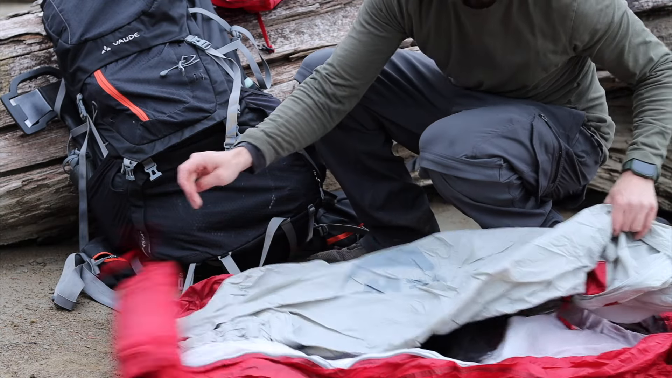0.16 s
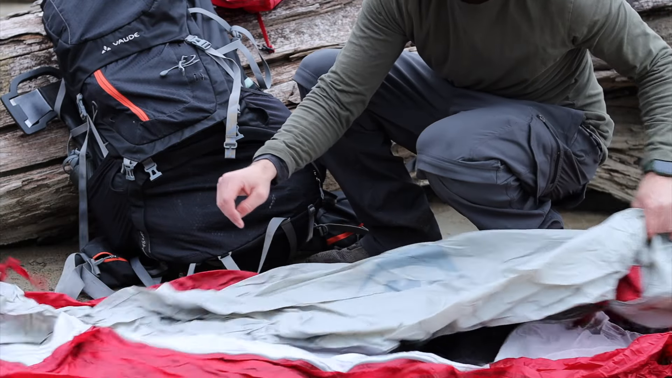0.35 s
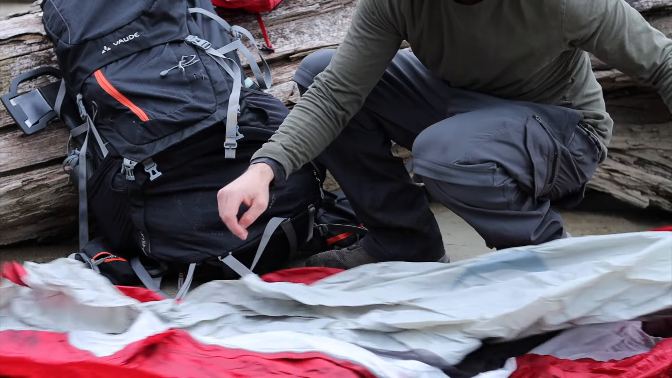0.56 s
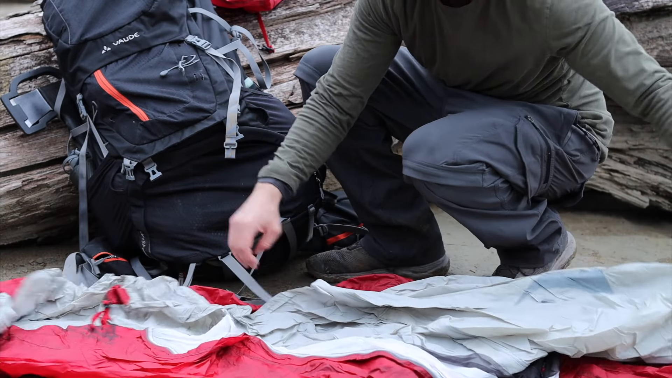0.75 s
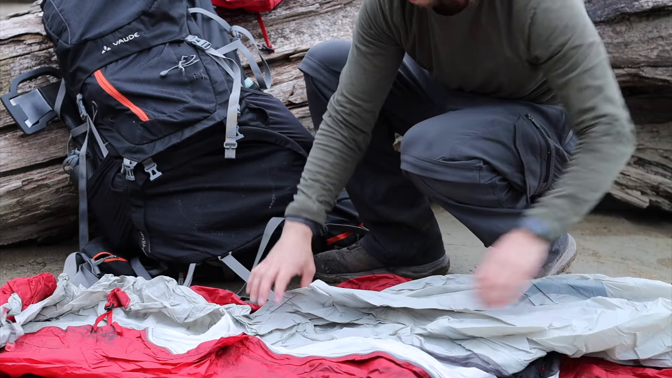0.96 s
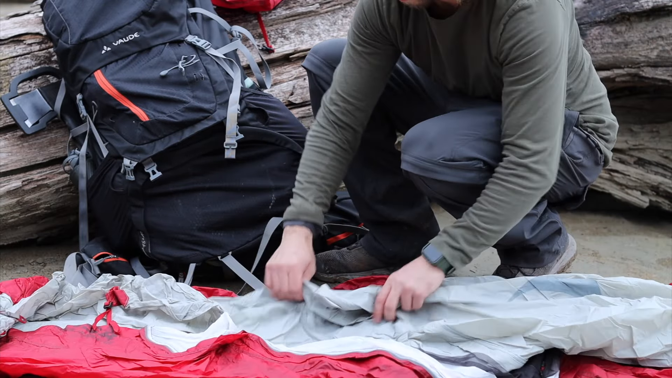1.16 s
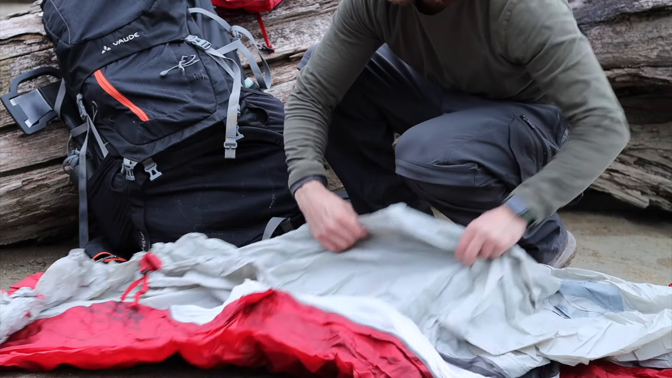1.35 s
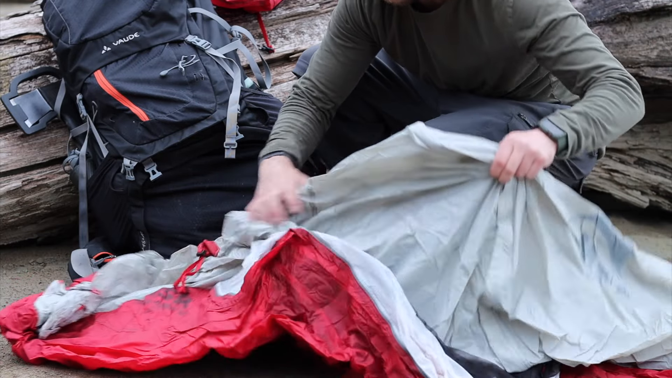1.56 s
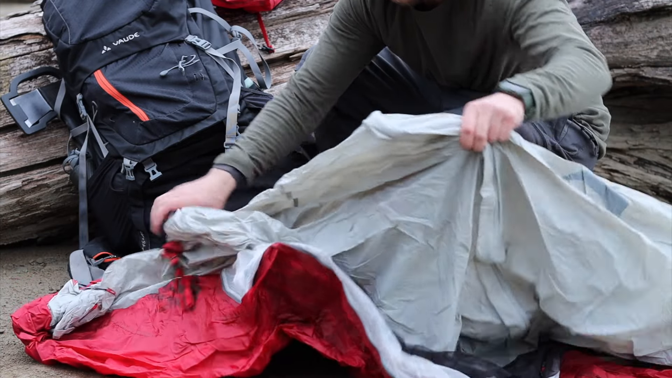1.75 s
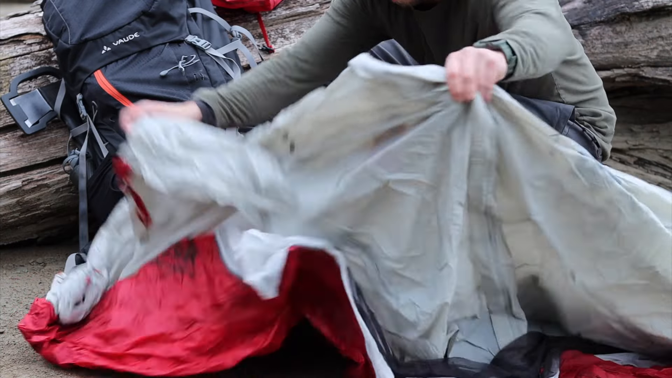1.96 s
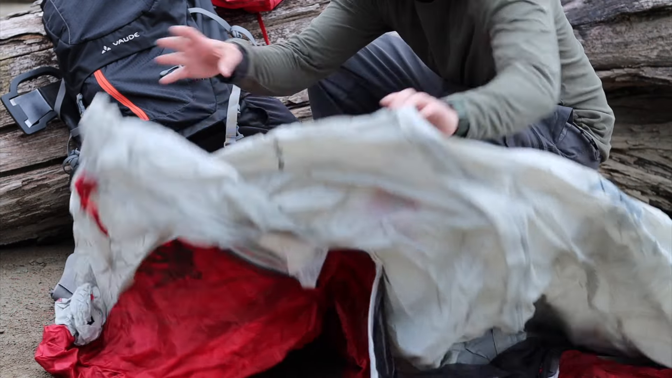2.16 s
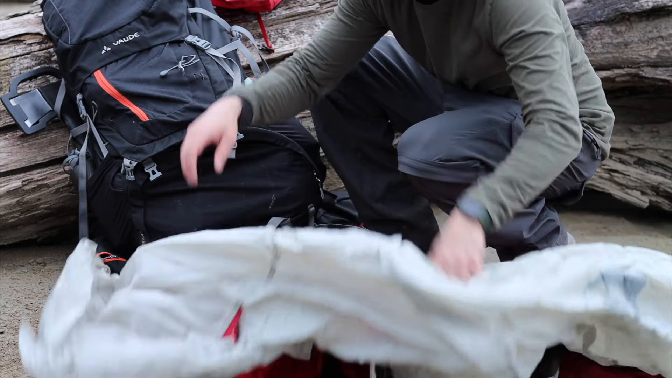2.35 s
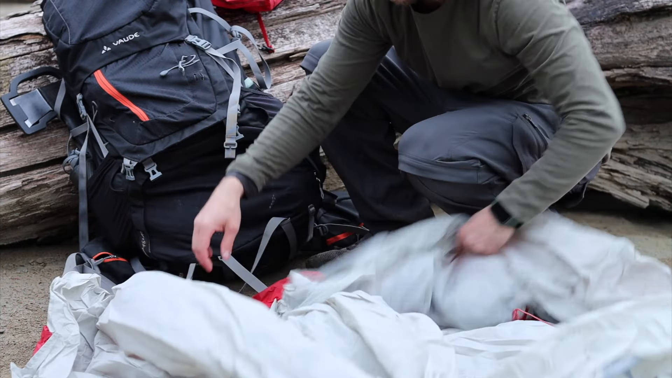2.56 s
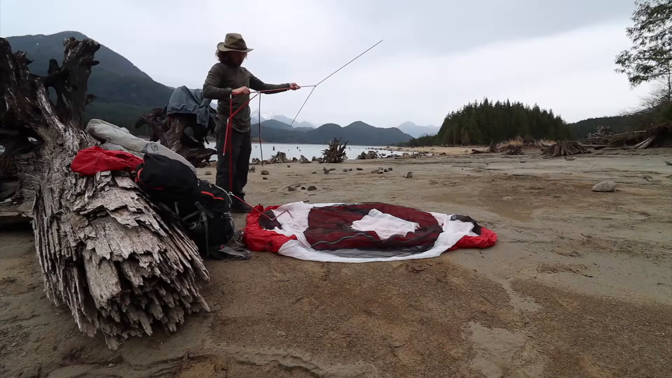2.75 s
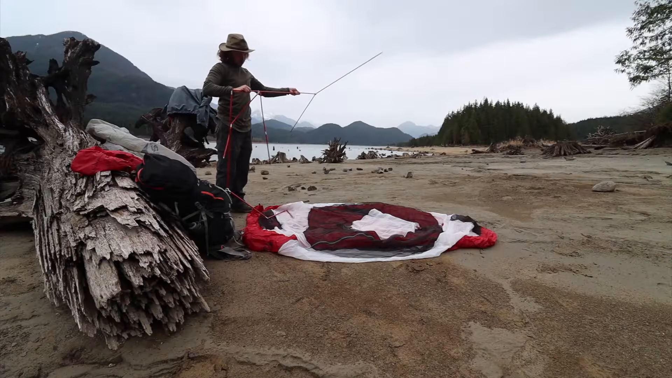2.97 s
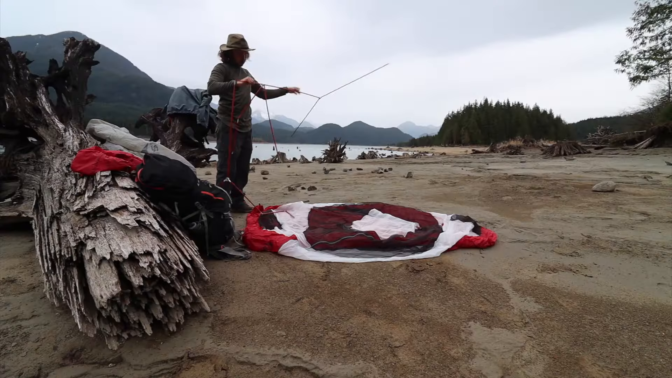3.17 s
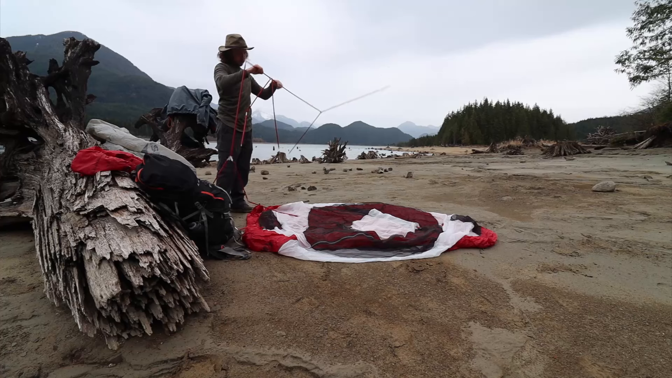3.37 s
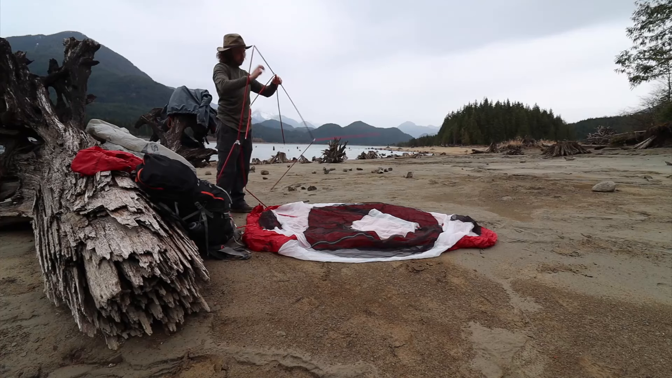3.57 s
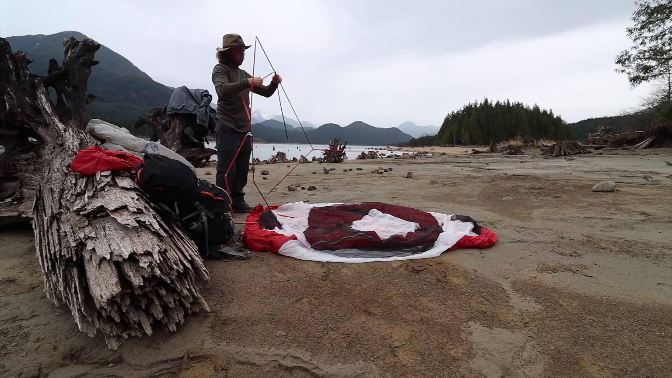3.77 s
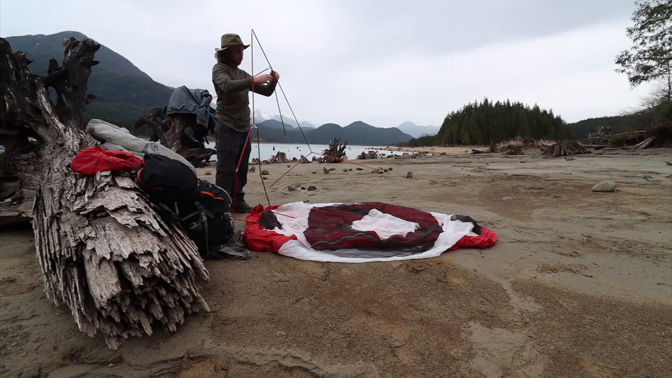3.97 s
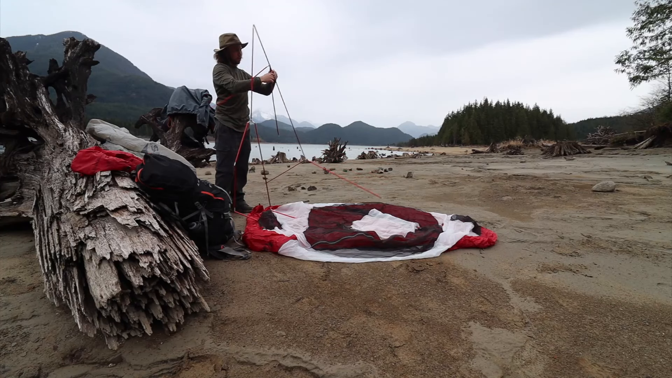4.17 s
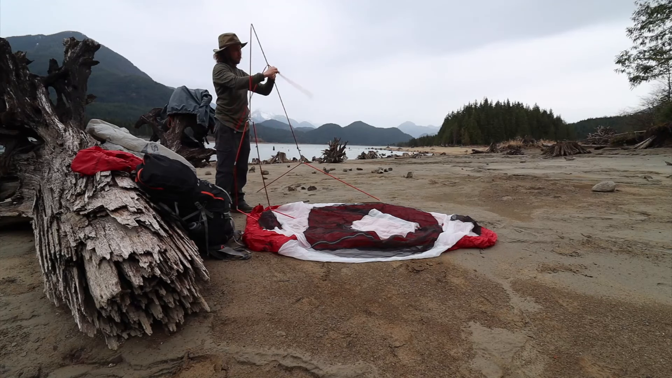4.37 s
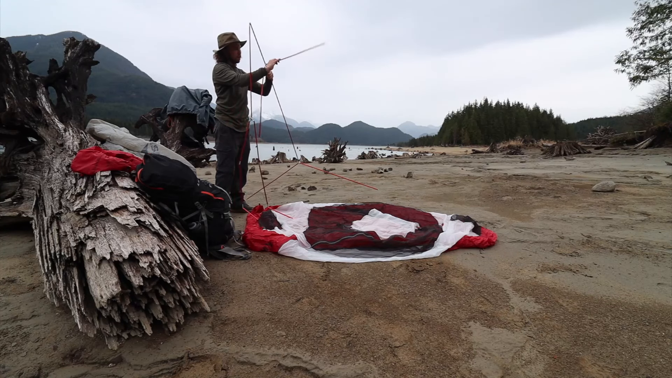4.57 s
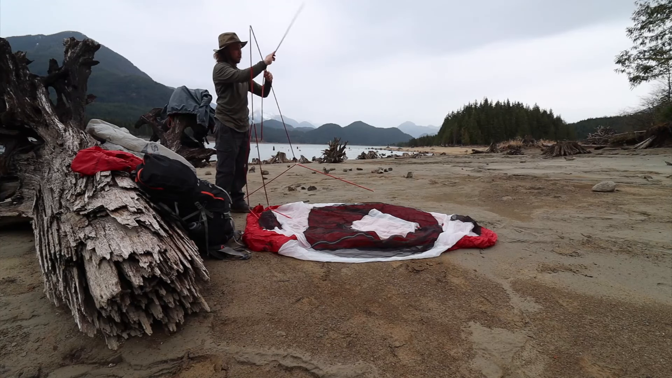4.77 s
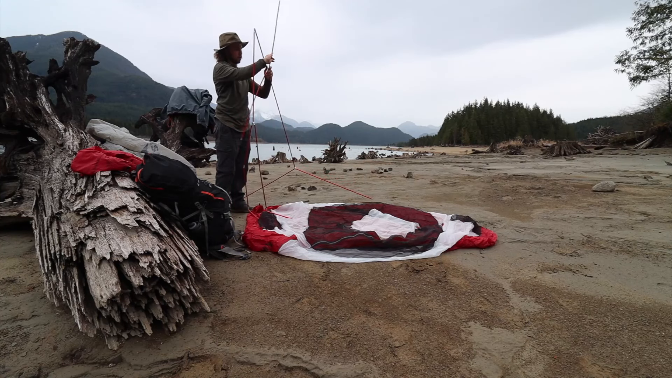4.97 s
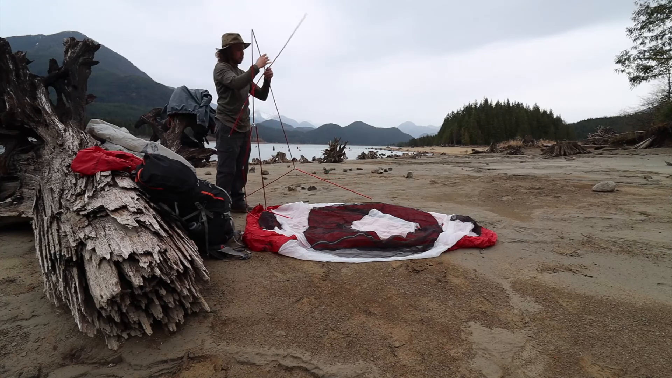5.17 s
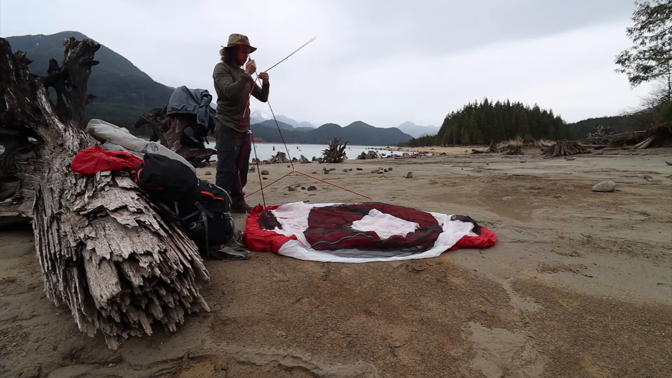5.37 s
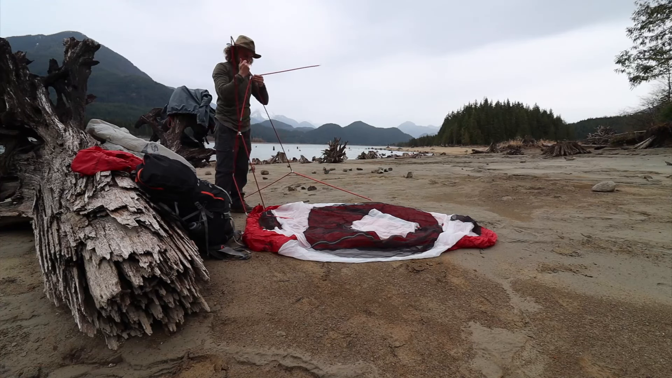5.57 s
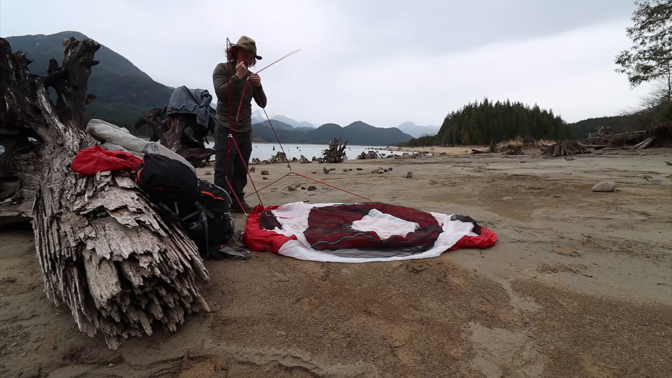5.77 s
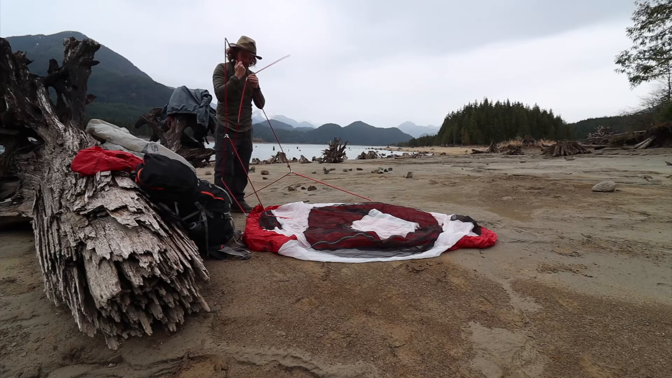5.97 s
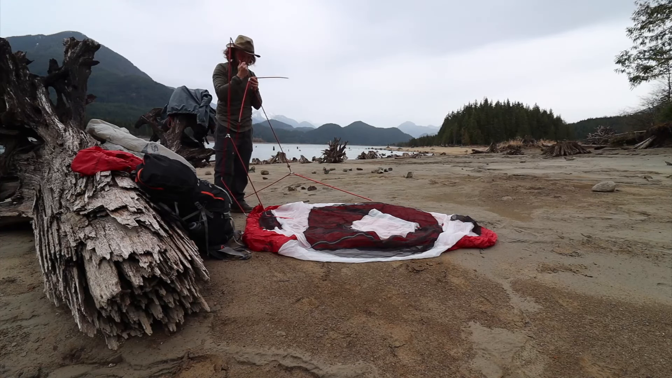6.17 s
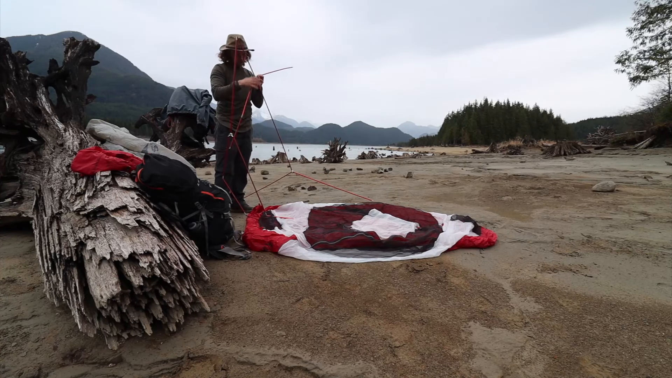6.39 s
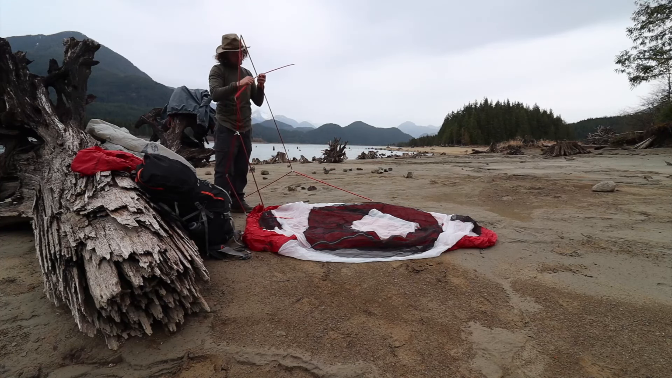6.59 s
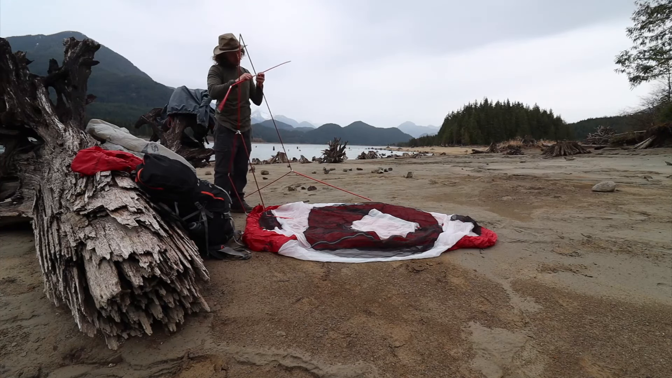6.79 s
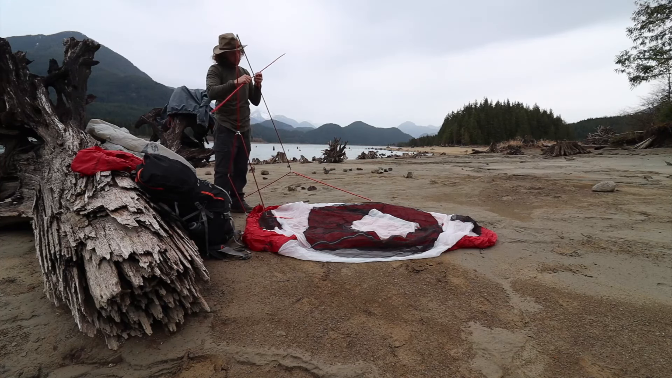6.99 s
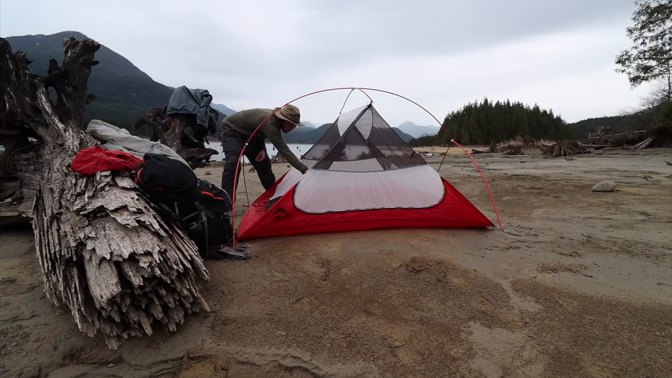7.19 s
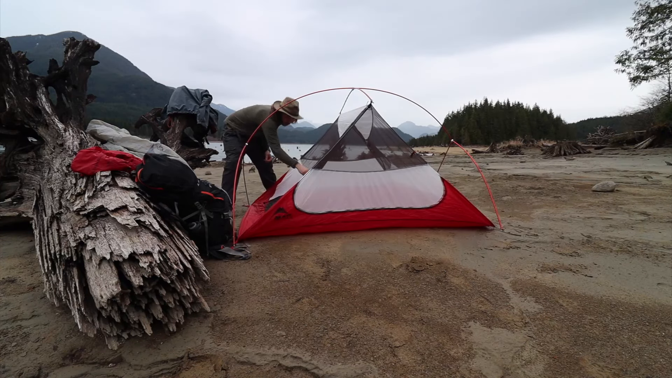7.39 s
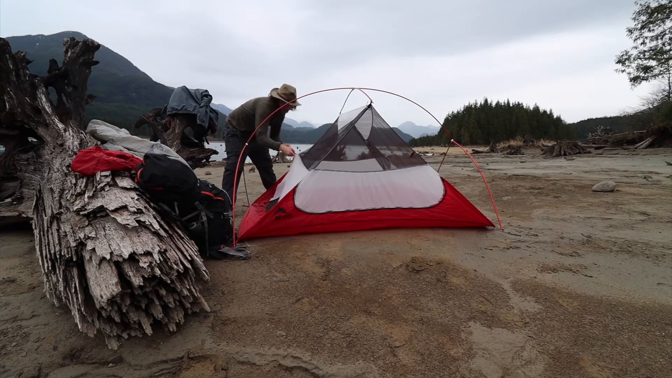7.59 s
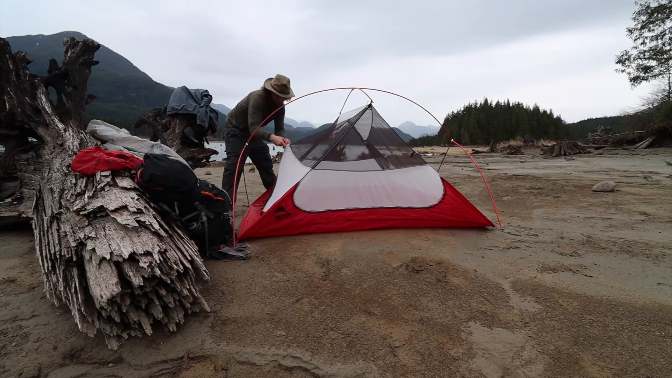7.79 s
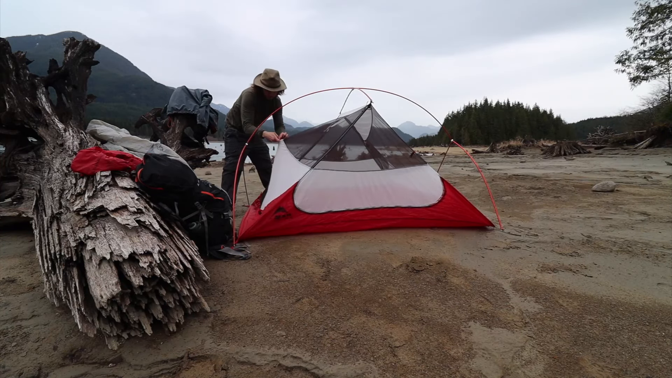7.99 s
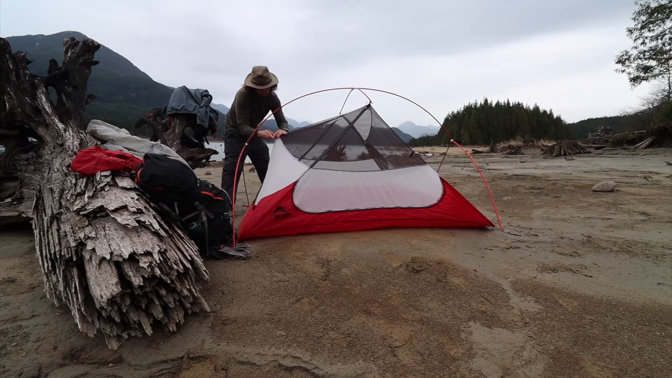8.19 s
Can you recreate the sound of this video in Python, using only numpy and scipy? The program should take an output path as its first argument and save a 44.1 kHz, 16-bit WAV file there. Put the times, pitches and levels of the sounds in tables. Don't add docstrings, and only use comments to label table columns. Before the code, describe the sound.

Nylon tent cloth rustles, snaps and crumples close by, then aluminium poles click and ring farther off on a quiet, faintly windy lake shore.

```python
import sys
import numpy as np
from scipy import signal
from scipy.fft import rfft, irfft, next_fast_len
from scipy.io import wavfile
from scipy.ndimage import uniform_filter1d

SR = 44100
rng = np.random.default_rng(int(sys.argv[2]) if len(sys.argv) > 2 else 0)


def ratio(d):
    e = np.asarray(d, float) / 20
    return 10 ** e


def wav_out(sig):
    wavfile.write(sys.argv[1], SR, np.round(np.clip(np.atleast_2d(sig).T, -1, 1) * 32767).astype(np.int16))


N = 363384
STEP = 40

# (frequency [Hz], level [dB per Hz])
SHORE_COLOUR = [(60, -11), (100, -3), (200, -5), (400, -4.5), (800, -7), (1400, -10), (2400, -16.5),
                (5000, -22), (10000, -28.5), (12700, -32), (13500, -48)]
SHORE_DB = -62.5
# (frequency [Hz], shared share [0-1])
SHORE_ALIKE = [(100, 0.9), (300, 0.81), (650, 0.48), (1400, 0), (15000, 0.18)]
# (time [s], hold [s], level [dB])
GUSTS = [(.05, .1, -92), (1.19, .1, -84), (1.88, .05, -79), (2.7, .03, -75), (3.63, 0.4, -71),
         (4.33, 0.034, -66.5), (4.6, 0.63, -70.5), (5.6, 0.33, -72.5), (6.15, 0.26, -69.5),
         (6.72, .1, -74.5), (7.5, .05, -71), (7.7, 0.47, -80.5)]
GUST_RISE_DB_PER_S, GUST_FALL_DB_PER_S, CALM_DB = 52, 60, -85.5
# (time [s], level [dB])
HUM_LOW = [(0, -75), (.15, -67.5), (.4, -66.5), (.8, -63), (1.1, -74), (1.3, -67), (1.5, -71),
           (1.75, -66.5), (2.0, -72), (2.3, -70), (2.5, -69), (2.7, -64), (2.76, -100), (8.24, -100)]
# (time [s], level [dB])
HUM_HIGH = [(1.2, -72), (1.9, -71), (2.4, -64), (2.76, -81.5), (7.08, -88), (7.15, -68), (7.3, -75.5),
            (7.45, -61), (7.62, -64.5), (7.72, -60), (7.9, -64.5), (8.05, -61), (8.24, -70)]
HUM_LOW_HZ, HUM_HIGH_HZ = 93.6, 121.6

# (time [s], peak [dB], loudest pitch [Hz], sheen [dB], chatter [ms])
JOINTS = [(2.9365, -31, 4060, -6.5, 5.1), (3.0275, -33, 4550, -14, 1.5), (3.0295, -35, 4470, -7, 5.5),
          (3.1252, -17.5, 10980, 1, 8.1), (3.6614, -40, 4010, -18, 14), (3.676, -34, 6980, -21, 6.1),
          (3.6955, -38, 5080, -26, 9.2), (3.7179, -23, 6440, -4, 4.6), (3.7394, -36, 4740, -17, 4.4),
          (3.7703, -36.5, 3670, -35, 4.4), (3.9779, -32, 5500, 4, 1.8), (3.9984, -41, 9520, 3.5, 1.8),
          (4.1327, -25, 6500, 2, 1.7), (4.2732, -36.5, 6780, -6, 4), (4.2852, -42, 6500, -7.5, 3),
          (5.1855, -18, 8400, -0.5, 6.9), (5.482, -22, 8000, -6, 2.0), (5.489, -30, 5020, -7, 3.8),
          (6.6124, -30.5, 7000, -4.5, 2.7), (6.7116, -45, 5730, -15, 2.8), (6.8104, -46.5, 7060, 0, 2.4),
          (6.9904, -14.5, 9050, 0.5, 3.8), (7.0114, -37, 3490, -4, 5.7)]
# (time [s],
# peak [dB], loudest pitch [Hz])
TOUCHES = [(3.19, -45, 10000), (3.243, -50, 3000), (3.456, -42, 2500), (3.545, -47, 4520),
           (3.595, -41, 4060), (3.647, -50, 9000), (3.667, -34.5, 6500), (3.688, -44, 3500),
           (3.716, -37, 5000), (3.7567, -39.5, 4610), (3.778, -44, 4500), (3.7928, -38.5, 4650),
           (3.804, -53, 4000), (3.83, -46, 3500), (3.847, -53, 5000), (3.853, -45, 2800), (3.87, -46, 4050),
           (3.875, -54, 6000), (3.9175, -46.5, 3500), (3.9318, -45.5, 5500), (3.987, -37, 9130),
           (4.069, -48, 3060), (4.109, -44, 4910), (4.13, -48, 6000), (4.194, -43, 3700), (4.23, -50, 5500),
           (4.244, -59, 5500), (4.28, -36.5, 2300), (4.289, -40, 3000), (4.296, -45, 2500),
           (4.302, -48, 5000), (4.312, -47, 3000), (4.324, -45, 4500), (4.328, -41, 5850),
           (4.335, -50, 2500), (4.343, -38.5, 2400), (4.353, -53, 6000), (4.365, -40, 4570),
           (4.38, -46, 2280), (4.413, -57, 5000), (4.583, -47.5, 3400), (4.6442, -47.5, 3170),
           (4.6677, -48.5, 4870), (4.696, -52, 4400), (4.74, -56, 3400), (4.833, -51.5, 10030),
           (5.2086, -52, 2890), (5.2318, -46, 1486), (6.803, -56, 6000), (6.878, -49, 4000),
           (6.882, -43, 3500), (6.901, -48, 2570), (6.953, -44, 6000), (6.96, -44, 4800),
           (7.071, -45, 9450),
           (7.6091, -53, 1970), (7.656, -54, 10160), (7.7226, -48, 3060), (7.75, -45.5, 2120),
         (7.7695, -47, 5100), (7.8137, -44.5, 3550), (7.853, -52, 3700), (7.9239, -55, 3830),
         (7.975, -50.5, 2300)]
# (loudest pitch [Hz], sheen [dB])
TOUCH_SHEEN = [(5000, -16.5), (9500, 0)]
# (frequency [Hz], level [dB per Hz])
CRACK_COLOUR = [(150, -56), (250, -25), (1050, -10.5), (3780, 1), (7630, -0.5), (10100, -3.5), (12700, -5),
                (13600, -14), (15400, -14), (16500, -24)]
# (time [s], hold [s], level [dB])
SLIDES = [(2.76, 0.012, -67), (3.0, 0.046, -63), (3.08, 0.049, -66), (3.2, 0.41, -69.5),
          (3.663, 0.029, -56.5), (3.75, 0.061, -66), (3.85, 0.38, -71.5), (4.274, 0.021, -60),
          (4.31, 0.042, -72), (4.4, 0.056, -76), (4.62, 0.084, -74.5), (4.93, 0.089, -71.5),
          (5.16, 0.018, -61), (5.2, 0.046, -73), (5.27, 0.12, -67), (5.55, 0.026, -69), (6.5, 0.18, -74.5),
          (6.715, 0.062, -63.5), (6.9, 0.11, -71), (7.03, 0.064, -64.5), (7.7, 0.16, -72), (7.87, .2, -82)]
SLIDE_RISE_DB_PER_S, SLIDE_FALL_DB_PER_S, SLIDE_FLOOR_DB = 1498, 206.5, -88.5
# (frequency [Hz], level [dB per Hz])
HANDLING_COLOUR = [(700, -22), (1300, -5.5), (2200, -1.5), (4200, -5), (6500, -4.5), (10000, -12),
                   (14000, -23.5)]
LONG_RING_HZ = 12345
# (time [s], modes of (frequency [Hz], peak [dB], t60 [s]))
SECTIONS = [
    (3.126, [(3690, -25, .035), (5300, -29, 0.037), (5600, -29, .03), (7900, -46, .065), (7200, -33.5, .04), (9100, -29, .04), (9000, -25, 0.039), (LONG_RING_HZ, -21.5, 0.061), (LONG_RING_HZ, -51, 0.23), (15000, -40, 0.09), (15800, -50, .086)]),
    (4.1327, [(2470, -42.5, 0.023), (5500, -30, 0.028), (8300, -37, 0.023)]),
    (5.186, [(1560, -37.5, 0.042), (2990, -33, 0.048), (3820, -33, 0.039), (4420, -24.5, 0.038), (6140, -23.5, 0.032), (8330, -33, .035), (10500, -24, 0.03), (10300, -48.5, 0.084), (10300, -61, 0.4), (14950, -33, 0.05)]),
    (5.4825, [(1510, -46, 0.036), (4360, -32, 0.038), (4780, -31.5, 0.025), (6150, -30, 0.029), (7500, -30, .03), (10000, -33, 0.038), (15200, -45, .04)]),
    (6.991, [(1526, -39, 0.053), (1980, -32, 0.031), (2534, -32.5, .025), (3200, -26.5, 0.031), (3980, -26.5, 0.029), (9530, -27, 0.038), (14970, -40, .05)]),
]
# (time [s], frequency [Hz], peak [dB])
KNOCKS = [(3.066, 860, -52), (3.215, 12400, -51), (3.978, 1120, -53), (4.132, 1500, -47), (4.132, 810, -56),
          (4.273, 450, -52.5), (4.276, 1330, -53), (4.28, 1900, -46), (4.292, 1500, -54), (4.322, 716, -56),
          (3.979, 15500, -52), (4.132, 15700, -54), (4.41, 4020, -64), (4.435, 800, -57), (4.45, 2500, -63),
          (4.58, 2300, -63), (4.644, 3200, -57), (4.882, 780, -53), (4.918, 2100, -63), (5.209, 2900, -50),
          (5.23, 10300, -66), (5.27, 10100, -58), (5.3, 10300, -66), (5.33, 5180, -63), (5.37, 4970, -66),
          (5.565, 2010, -60), (5.64, 760, -61), (5.66, 740, -60), (5.674, 830, -62.5), (6.712, 4030, -53),
          (6.712, 5800, -56), (6.722, 5760, -56), (6.73, 2150, -58), (6.745, 2230, -61), (6.747, 4250, -58),
          (6.758, 4150, -59), (6.76, 2450, -59), (6.772, 4050, -58), (6.775, 4900, -61), (6.78, 2600, -61),
          (6.81, 7050, -54), (6.88, 2850, -57), (6.902, 1140, -54), (6.902, 2600, -51), (6.958, 1040, -58),
          (7.073, 9460, -51), (7.09, 9530, -56), (7.502, 1127, -57)]
# (time [s], left minus right [dB])
POLE_PAN = [(2.93, 3), (3.03, 2), (3.13, 3.5), (3.7, 1), (3.98, 4.5), (4.13, 2), (4.28, 0), (5.19, 1),
            (5.48, 1.5), (6.2, -2), (6.61, 3.5), (6.99, 0.5), (7.3, 4), (8.2, 0.5)]
POLES_FROM_S = 2.74

# (time [s], level [dB], slack [-1 taut and bright .. 1 loose and boomy])
CLOTH = [(0, -47.5, -0.16), (.23, -45, 0.13), (.28, -52, -0.17), (.5, -43.5, 0.015), (.79, -46.5, -0.00055),
         (.83, -52, 0.18), (.9, -57.5, 0.4), (.97, -61, 0.4), (1.0, -63.5, -0), (1.06, -75, 0.017),
         (1.16, -51.5, 0.46), (1.26, -45.5, 0.12), (1.5, -48.5, 0.33), (1.78, -49, -0.0033),
         (2.02, -40.5, -0.17), (2.09, -45, -0.24), (2.17, -51, 0.18), (2.42, -55.5, 0.5), (2.46, -50, 0.8),
         (2.7, -45, 0.23)]
# (frequency [Hz], level [dB per Hz])
CLOTH_COLOUR = [(71, -17.5), (120, -11), (147, -5.5), (231, -2.5), (605, -3.5), (2340, 0.5), (3980, -1.5),
                (4780, -3), (11300, -8), (14700, -19), (15900, -34), (16300, -50)]
# (frequency [Hz], shared share [0-1])
CLOTH_ALIKE = [(150, 0.98), (600, 1), (1500, 0.92), (4000, 0.79), (9000, 0.06), (15000, 0.67)]
SLACK_LOW_DB, SLACK_HIGH_DB = 7.5, -6.5
CLOTH_END_S, CLOTH_FADE_S = 2.738, 0.018
# (time [s], hold [s], level [dB])
TUGS = [(.025, 0.025, -44.5), (.108, 0.0094, -37), (.143, 0.0031, -35.5), (.5, 0.0045, -46),
        (.848, 0.0091, -65), (.938, .01, -56), (.99, .004, -72), (1.09, .004, -58), (1.108, 0.0026, -47.5),
        (1.135, 0.0087, -55), (1.44, 0.0067, -52), (2.443, 0.02, -47.5)]
TUG_RISE_DB_PER_S, TUG_FALL_DB_PER_S = 898, 457
TUG_SLACK = 0.063
# (time [s], peak [dB], loudest pitch [Hz])
FOLDS = [(0.106, -27, 2320), (.1095, -18, 2300), (0.116, -10, 5630), (0.139, -6.5, 4200),
         (0.15, -16.5, 4390), (0.172, -43, 4610), (.2896, -27.5, 4160), (.345, -30, 7500), (.38, -28, 6000),
         (.41, -25.5, 3000), (0.5874, -29, 3400), (.85, -48, 7100), (0.932, -29, 850), (.938, -27, 900),
         (.952, -33, 1800), (0.964, -43, 6500), (0.994, -37, 5500), (1.022, -37.5, 1330),
         (1.0704, -44, 2270), (1.0903, -39, 5780), (1.103, -32, 1210), (1.138, -25.5, 3000),
         (1.143, -32, 2000), (1.149, -23, 3850), (1.202, -26.5, 3160), (1.213, -24.5, 1250),
         (1.247, -24.5, 3020), (1.634, -28, 1880), (2.097, -34, 2150), (2.341, -34, 2260),
         (2.381, -34, 2290), (2.44, -31, 2800), (2.445, -30, 600), (2.457, -26, 2700), (2.549, -30, 500),
         (2.6207, -32, 2470), (2.65, -28, 2300), (2.669, -29, 6000), (2.676, -29, 2000), (2.697, -31, 2000)]
FOLD_DULLING = 0.41
# (time [s], peak [dB])
BUCKLE = [
    (0.057, -41),
    (.061, -29),
    (0.066, -31.5),
    (0.071, -37),
    (0.075, -29.5),
    (0.156, -31),
    (0.172, -36),
    (0.189, -40),
]
# (frequency [Hz], level [dB], t60 [s])
BUCKLE_MODES = [(4480, 9, 0.019), (4650, -11, 0.099), (7730, 0, 0.017), (8120, -2.5, 0.053),
                (11500, -12, 0.013), (12650, -6.5, 0.025)]

CLOTH_LAG, POLE_LAG = 2, -1
LAG_PER_PAN_DB = -.12


def rms_one(x):
    return x / np.sqrt(np.mean(x ** 2) + 1e-20)


def in_time(rows):
    s, *columns = np.transpose(rows)
    return [np.interp(np.arange(N) / SR, s, c) for c in columns]


def at_hz(points, hz):
    table_hz, values = np.array(points).T
    return np.interp(np.log(hz), np.log(table_hz), values)


def spread(slow, count):
    return np.interp(np.arange(count) / STEP, np.arange(len(slow)), slow)


def drift(rate, count):
    r = np.exp(-2 * np.pi * STEP * rate / SR)
    noise = rng.standard_normal(count // STEP + 2002)
    return rms_one(signal.lfilter([1], [1, -2 * r, r * r], noise)[2000:])


def swells(rows, rise_db_per_s, fall_db_per_s, floor_db):
    t = np.arange(N // STEP + 2) * STEP / SR
    s, hold, db = np.transpose(rows)[:, :, None]
    before, after = np.maximum(s - t, 0), np.maximum(t - s - hold, 0)
    each = db - rise_db_per_s * before - fall_db_per_s * after
    return spread(10 * np.log10(np.sum(ratio(2 * each), axis=0) + ratio(2 * floor_db)), N)


def ring(clicks, hz, t60):
    r, w = ratio(-60 / (max(t60, .003) * SR)), 2 * np.pi * hz / SR
    return signal.lfilter([0, np.sin(w)], [1, -2 * r * np.cos(w), r * r], clicks + 1e-18)


def grains(count, per_s, spread_db, hiss):
    sizes = np.exp(spread_db / 15.4 * np.minimum(rng.exponential(1, (2, count)), 5))
    clumps = spread(ratio(3.0 * drift(40.0, count)), count)
    chance = rng.random((2, count)) * SR / per_s / clumps
    clicks = rms_one(sizes * (chance < 1) * np.sign(chance - .5))
    trains = clicks + hiss * rng.standard_normal((2, count))
    return np.vstack([trains, trains * rng.choice([-1, 1], trains.shape)])


def band_noise(source, colour, alike, lag, patchy_db, lowest, low_db=0, high_db=0):
    count, edges = source.shape[1], 70 * 2 ** np.arange(lowest, 8.1, .5)
    size = next_fast_len(count, True)
    gain = ratio(at_hz(colour, np.fft.rfftfreq(size, 1 / SR) + 1))
    source = rms_one(irfft(rfft(source, size) * gain, size)[:, :count])
    together = drift(4.5, count)
    out = 0
    for k, (low, high) in enumerate(zip(edges, edges[1:])):
        band = signal.butter(2, [low, high], "band", fs=SR, output="sos")
        shared, own = signal.sosfilt(band, source[[k % 2, 2 + k % 2]])
        hz = np.sqrt(low * high)
        share = np.clip(at_hz(alike, hz), 0, 1)
        tilt_db = low_db * at_hz([(500, 1), (1100, 0)], hz) + high_db * at_hz([(2600, 0), (4800, 1)], hz)
        flicker_db = patchy_db * (0.53 * together + drift(8.8, count))
        same = np.array([np.roll(shared, lag), shared])
        apart = np.array([own, np.roll(own, 20011)])
        pair = np.sqrt(share) * same + np.sqrt(1 - share) * apart
        out = out + spread(ratio(tilt_db + flicker_db), count) * pair
    return out


def shaped(x, colour, peak_hz, peak_db, sheen_db):
    size = x.shape[1]
    hz = np.maximum(np.fft.rfftfreq(size, 1 / SR), 20)
    hump = peak_db * np.exp(-(np.log(hz / peak_hz) / 0.27) ** 2)
    uneven = rms_one(uniform_filter1d(rng.standard_normal(hz.size), size=25))
    uneven = 1.97 * np.minimum(hz / 3000, 1) * uneven
    body = -8.7 * np.log(peak_hz / 4500) * at_hz([(1700, 0.95), (2800, 0.12)], hz)
    sheen = sheen_db * at_hz([(5500, 0.079), (9000, 0.82)], hz)
    cepstrum = irfft(np.log(ratio(at_hz(colour, hz) + hump + uneven + body + sheen)))
    cepstrum[1:size // 2] *= 2
    cepstrum[size // 2 + 1:] = 0
    return irfft(rfft(x) * np.exp(rfft(cepstrum)))


def cracks(table, colour, t60, sheen_db, tail_db, pan_db, lag, apart):
    size = 4096
    out = np.zeros((2, N + size))
    t = np.arange(size) / SR
    close = np.minimum((t[-1] - t) / .03, 1)
    for s, peak_db, peak_hz, rel_db, chatter_ms in table:
        draw, chatter = rng.standard_normal((4, size)), max(chatter_ms, .5) / 1000
        sag_db = 9 * np.minimum(t / chatter, 1)
        fall = ratio(-sag_db - 60 * np.maximum(t - chatter, 0) / max(t60, .005))
        tail = ratio(tail_db - 60 * t / 0.091)
        rise = .3 * chatter
        envelope = np.minimum(.5 * t / rise + 0.66, 1) ** 2 * (fall + tail)
        bunches = ratio(10.2 * uniform_filter1d(draw[3], size=24))
        blow = .35 * np.exp(-((t - rise) / .0005) ** 2)
        hits = draw[:3] * (bunches * envelope + blow)
        shared, *own = shaped(hits, colour, peak_hz, 4.5, rel_db + sheen_db)
        at = round(s * SR) - 20
        pan = pan_db[at]
        late = np.exp(-2j * np.pi * np.fft.rfftfreq(size) * (lag + LAG_PER_PAN_DB * pan))
        pair = np.array([irfft(rfft(shared) * late), shared])
        pair = (pair + apart * np.array(own)) * close
        height = 3.2 * np.sqrt(np.mean(pair.mean(axis=0)[:260] ** 2))
        out[:, at:at + size] += ratio(peak_db) * pair / height * ratio([[pan / 2], [-pan / 2]])
    return out[:, :N]


def water_and_air():
    return ratio(SHORE_DB) * band_noise(rng.standard_normal((4, N)), SHORE_COLOUR, SHORE_ALIKE, 0, 0.97, 0)


def wind():
    low_band = signal.butter(2, [42, 78], "band", fs=SR, output="sos")
    left, right = signal.sosfilt(low_band, rng.standard_normal((2, N)))
    gusts = rms_one(np.array([.4 * left + 0.2 * right, right]))
    lumps = spread(ratio(1.8 * drift(7.0, N)), N)
    return ratio(swells(GUSTS, GUST_RISE_DB_PER_S, GUST_FALL_DB_PER_S, CALM_DB)) * lumps * gusts


def engine():
    t = np.arange(N) / SR
    low_db = in_time(HUM_LOW)[0] + 4.0 + spread(1.4 * drift(4.9, N), N)
    low_turn = 2 * np.pi * HUM_LOW_HZ * t + spread(.7 * drift(2.8, N), N)
    high_turn = 2 * np.pi * HUM_HIGH_HZ * t + spread(0.92 * drift(2.9, N), N)
    high = np.sin(high_turn) + 0.22 * np.sin(2 * high_turn)
    return ratio(low_db) * np.sin(low_turn) + ratio(in_time(HUM_HIGH)[0] + 2.5) * high


def sliding_sleeves():
    start = round(POLES_FROM_S * SR)
    source = grains(N - start, 1300.0, 4.3, hiss=0.37)
    rustle = band_noise(source, HANDLING_COLOUR, CLOTH_ALIKE, POLE_LAG, 2.2, lowest=3.5)
    level_db = swells(SLIDES, SLIDE_RISE_DB_PER_S, SLIDE_FALL_DB_PER_S, SLIDE_FLOOR_DB)
    out = np.zeros((2, N))
    out[:, start:] = ratio(level_db[start:]) * rustle
    return out


def touches_and_hooks(pan_db):
    ticks = [(s, db, hz, at_hz(TOUCH_SHEEN, hz), 3.2) for s, db, hz in TOUCHES]
    return ratio(-4.0) * cracks(ticks, CRACK_COLOUR, 0.025, 2.5, -11.0, .5 * pan_db, POLE_LAG, apart=0.64)


def ringing_tubes(pan_db):
    out = np.zeros(N)
    modes = [(s, *mode, 0.57) for s, section in SECTIONS for mode in section]
    modes += [(*knock, 0.052, .55) for knock in KNOCKS]
    for s, hz, peak_db, t60, share in modes:
        size = round(t60 * SR) + 200
        noise = np.resize(rng.standard_normal(4000), size)
        rattle = noise * ratio(-60 * np.arange(size) / SR / (1.31 * share * t60))
        tone = ring(rattle, hz, (1 - share) * t60)
        at = round(s * SR)
        out[at:at + size] += ratio(peak_db) * tone / np.abs(tone).max()
    left = ratio(2.0 + 0.35 * pan_db) * np.roll(out, POLE_LAG)
    return np.array([left, ratio(-0.54 * pan_db) * out])


def poles():
    pan_db, = in_time(POLE_PAN)
    joints = cracks(JOINTS, CRACK_COLOUR, 0.029, 2.1, -49.0, pan_db, POLE_LAG, apart=0.35)
    return joints + touches_and_hooks(pan_db) + sliding_sleeves() + ringing_tubes(pan_db)


def buckle():
    taps = np.zeros(round(CLOTH_END_S * SR))
    for s, peak_db in BUCKLE:
        at = round(s * SR)
        taps[at:at + 220] = ratio(peak_db - 26.0) * rng.standard_normal(220)
    tones = sum(ratio(db) * ring(taps, hz, t60) for hz, db, t60 in BUCKLE_MODES)
    return np.pad(tones, (0, N - len(tones)))


def cracking_folds():
    folds = [(s, db, hz, -FOLD_DULLING * (db + 19.0), 4.0) for s, db, hz in FOLDS]
    return ratio(-9.0) * cracks(folds, CLOTH_COLOUR, 0.049, 4.6, -9.0, np.zeros(N), CLOTH_LAG, apart=0.21)


def sliding_cloth():
    count = round(CLOTH_END_S * SR)
    drag_db, slack = [column[:count] for column in in_time(CLOTH)]
    tugs = ratio(swells(TUGS, TUG_RISE_DB_PER_S, TUG_FALL_DB_PER_S, -120))[:count]
    level = np.hypot(ratio(drag_db), tugs)
    slack = slack + TUG_SLACK * (1 - ratio(drag_db) / level)
    level = level * np.minimum(np.arange(count, 0, -1) / SR / CLOTH_FADE_S, 1) ** 2
    slack = np.append(slack, np.zeros(2 * STEP))[:STEP * (count // STEP + 2):STEP]
    source = grains(count, 1800.0, 3.7, hiss=0.7)
    low_db, high_db = 0.5 + SLACK_LOW_DB * slack, 1.5 + SLACK_HIGH_DB * slack
    rub = band_noise(source, CLOTH_COLOUR, CLOTH_ALIKE, CLOTH_LAG, 1.94, 0, low_db, high_db)
    out = np.zeros((2, N))
    out[:, :count] = ratio(2.5) * level * rub
    return out


def cloth():
    return sliding_cloth() + cracking_folds() + buckle()


def scene():
    return water_and_air() + wind() + engine() + poles() + cloth()


def low_pass(x):
    return signal.sosfilt(signal.butter(12, 16990, fs=SR, output="sos"), x)


def record(dry):
    top_cut = signal.cheby2(10, 60, 17150, fs=SR, output="sos")
    mix = signal.sosfilt(top_cut, dry)
    return low_pass(mix)


dry = scene()
out = record(dry)
wav_out(out)
```